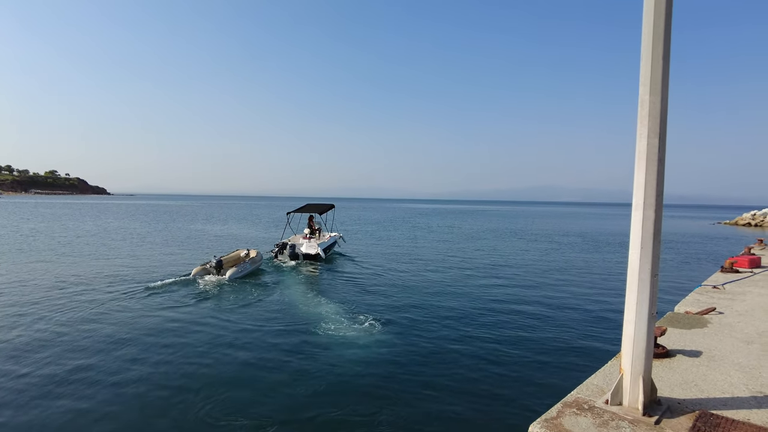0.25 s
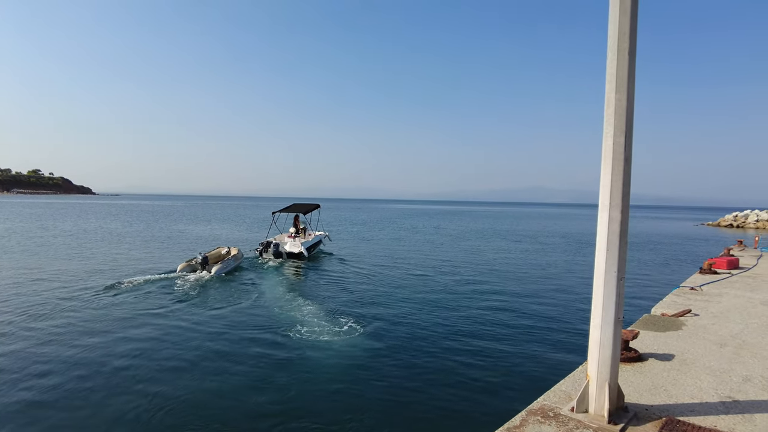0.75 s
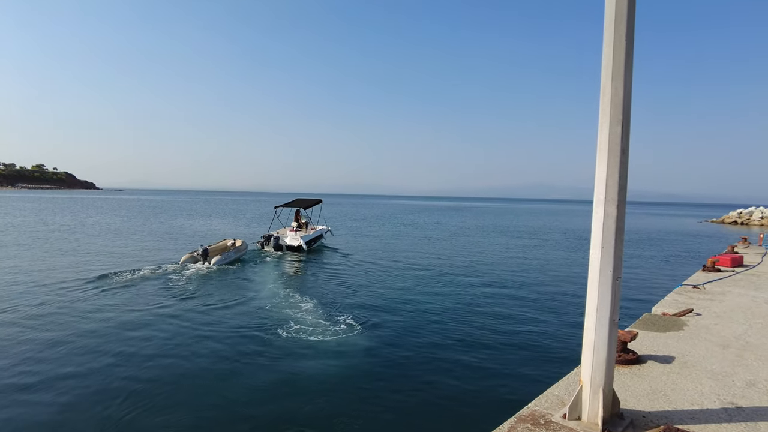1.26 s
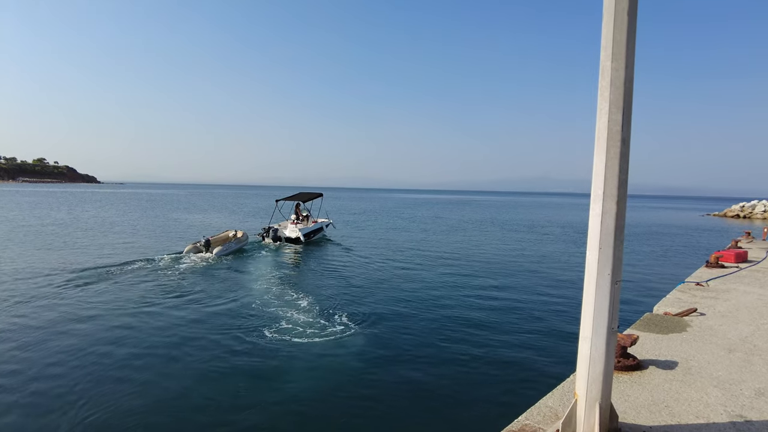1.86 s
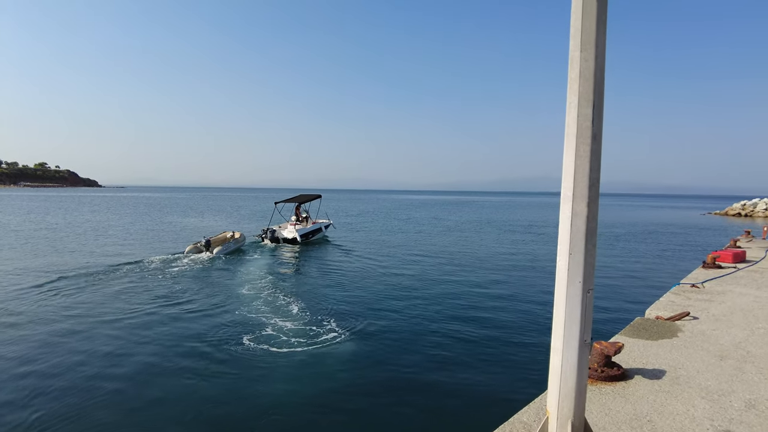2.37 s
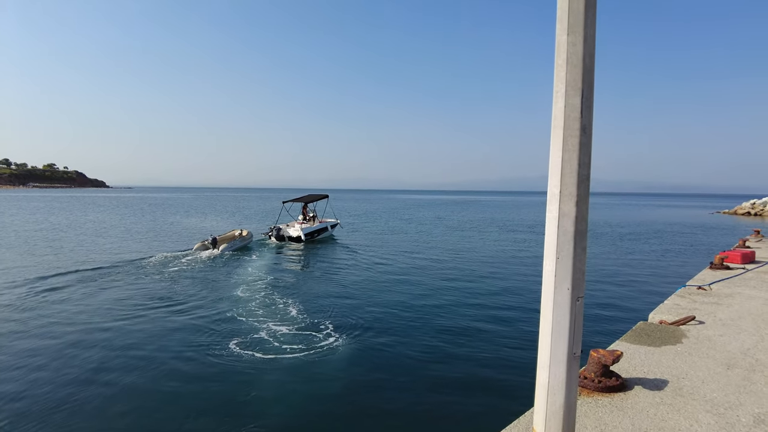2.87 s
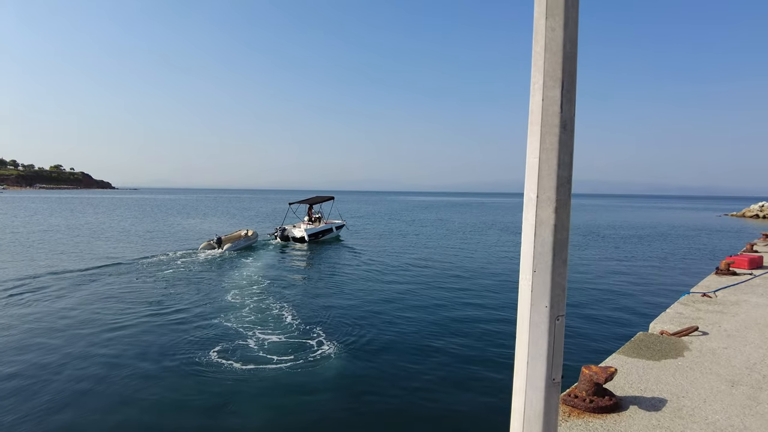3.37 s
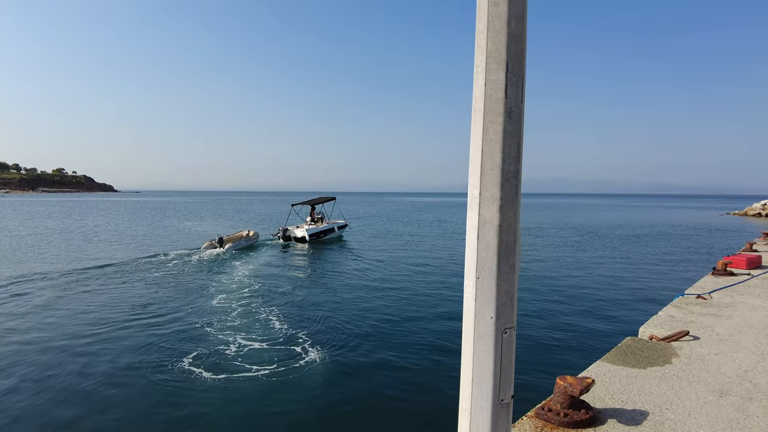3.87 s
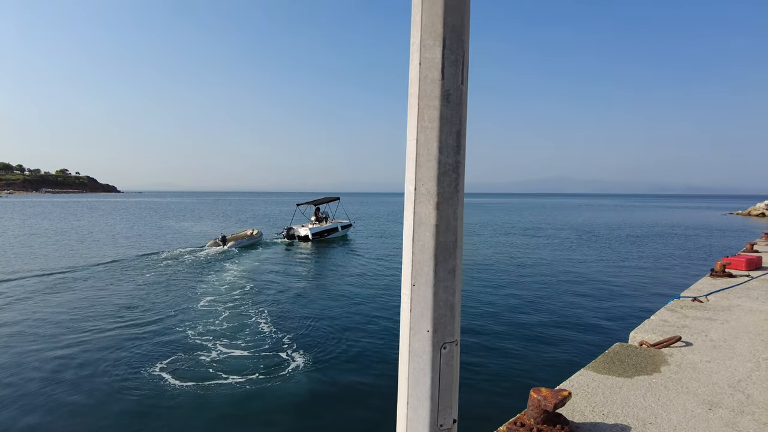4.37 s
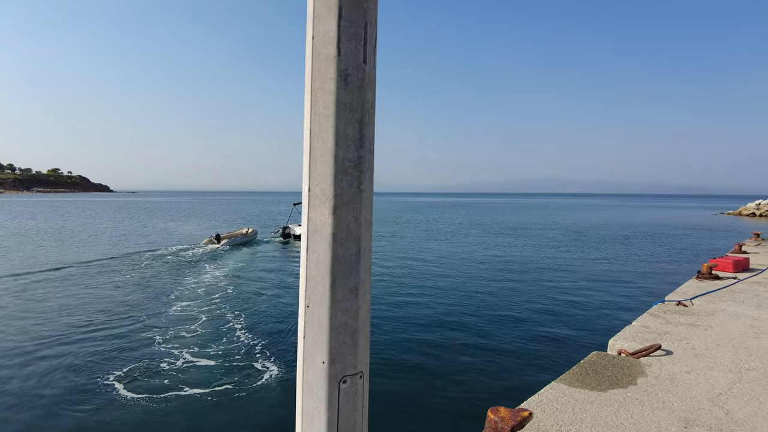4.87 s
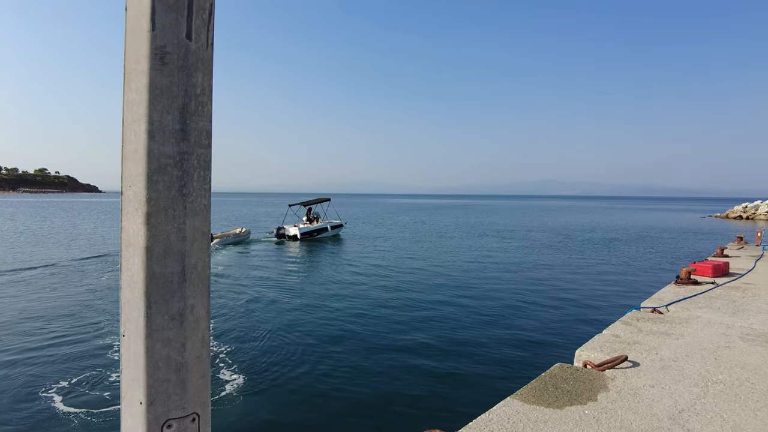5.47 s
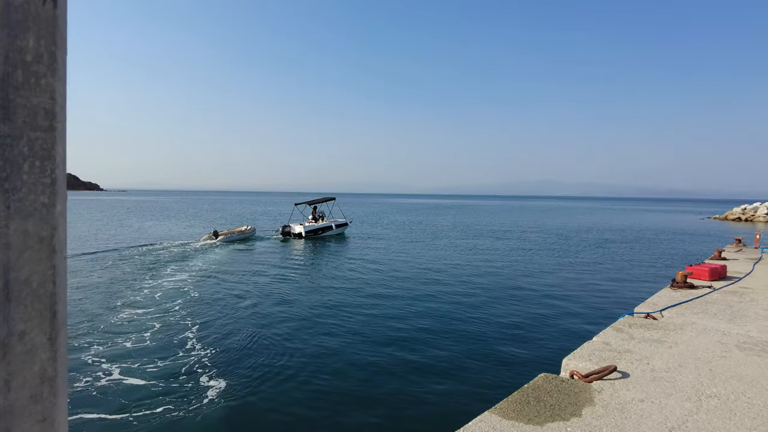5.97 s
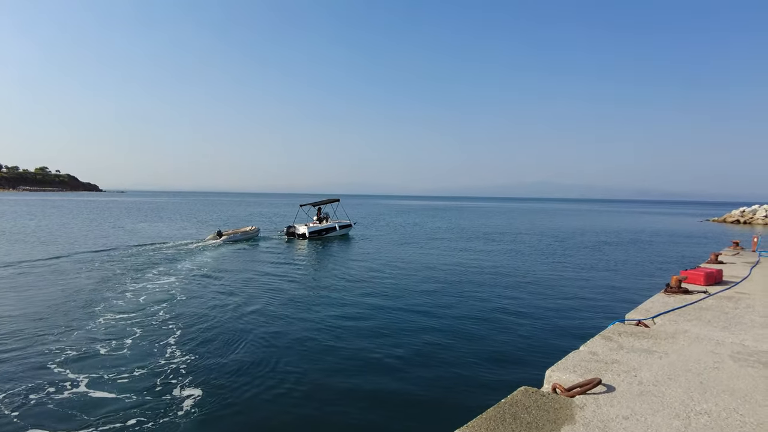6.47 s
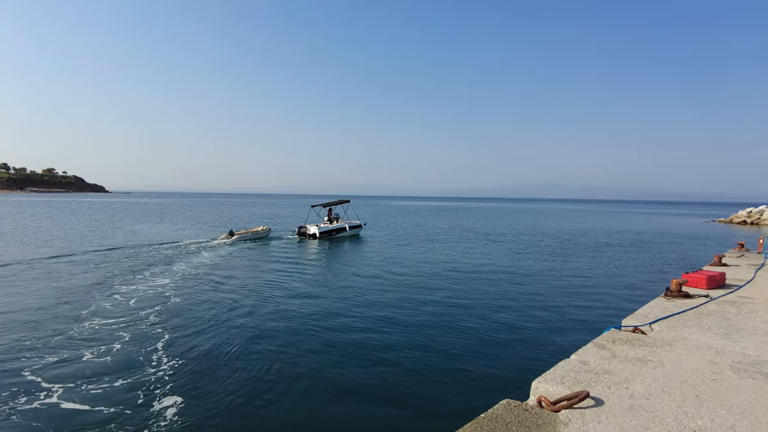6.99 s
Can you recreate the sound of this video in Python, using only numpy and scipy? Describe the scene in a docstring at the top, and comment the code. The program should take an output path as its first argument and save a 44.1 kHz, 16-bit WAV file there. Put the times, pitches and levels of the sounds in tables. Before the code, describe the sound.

From the start an outboard motor runs at some distance on open water: a low drone near 100 Hz with a weaker tone an octave below, wavering in level, plus a muffled pulsing roar and faint nasal hum. A thin whistle around 4.5 kHz is clearest at first, then comes and goes. The wake is a steady soft hiss full of tiny bubbles, thinning to about 5.3 s and partly returning. Low wind rumble fades in the first second. Plops sound at the quay wall near 0.9, 1.4, 2.0, 3.1, 3.6 and 7.0 s, with soft slaps around 0.9, 3, 5.95 and 7 s. Dry close ticks occur at 0.3, 0.6, 1.1 and 1.7 s, cluster around 3, one bright at 4, more near 6. From 4.4 to 5.6 s gusts swell with dull thuds, another at 6. The drone dips, surging briefly until the end at 7.2 s.

```python
"""A small outboard motor drones on a calm bay as its boat draws away from a stone quay.
Unsteady sines make the exhaust drone; pulsing noise makes the cowl's roar, and filtered noise the casing's hum.
A thin whistle comes and goes. Noise and rising damped sines make the hissing, bubbling wake.
Gusts are low noise with a few thuds; damped sines make plops at the wall and dry ticks close by.
All but the ticks pass a two-port microphone model that sets the stereo image."""
import sys
import numpy as np
from scipy import signal
from scipy.fft import rfft, irfft, next_fast_len
from scipy.io import wavfile
from scipy.ndimage import uniform_filter1d, map_coordinates

SR = 44100
rng = np.random.default_rng(int(sys.argv[2]) if len(sys.argv) > 2 else 0)


def persist_wave(psi):
    """Save psi, clipped to +-1, as 16-bit WAV."""
    counts = np.round(np.clip(psi, -1, 1) * 32767).astype(np.int16)
    wavfile.write(sys.argv[1], SR, np.atleast_2d(counts).T)


N = 318843  # length in samples

# Loudness of the boat's two noises: t/s, wake level/dB, cowl roar level/dB
BOAT_LEVELS = [(0.05, -52, -49), (2.24, -54.5, -51), (2.6, -54, -52.5), (3.1, -54.5, -51.5),
               (3.63, -54.5, -51), (5.05, -56, -59.5), (5.35, -58.5, -55.5), (5.66, -57.5, -58),
               (6.14, -55, -60), (6.7, -56, -53.5), (7.2, -56.5, -52.5)]
# Colour of churned water: f/Hz, relative level/dB
WATER_COLOUR = [(590, -8.5), (1000, 1.5), (1160, -2), (1350, 2), (1480, 0), (1590, 0), (1900, -5),
                (2080, -9), (3000, -9), (3860, -18), (4370, -15), (5140, -18.5), (5660, -16), (7000, -21.5),
                (9100, -34), (15400, -120)]


def amp(db):
    """Turn a level in dB into a gain."""
    return 10 ** (np.asarray(db) / 20)


def unit(x):
    """Scale x to an rms of 1."""
    return x / np.sqrt(np.mean(x ** 2) + 1e-20)


def along(points, hz):
    """Read each column after the frequency, on a log frequency axis."""
    f, *cols = np.transpose(points)
    return np.squeeze([np.interp(np.log(hz + 1), np.log(f + 1), c) for c in cols])


def curves(rows):
    """Draw each column after the time as one value per sample."""
    s, *cols = np.transpose(rows)
    return [np.interp(np.arange(N) / SR, s, c) for c in cols]


def wobble(rate):
    """Draw a smooth random curve with rate knots a second."""
    knots = rng.standard_normal(int(N * rate / SR) + 4)
    return map_coordinates(knots, [np.arange(N) * rate / SR])


def filtered(x, response):
    """Multiply the spectrum of x by a response that depends on frequency."""
    m = next_fast_len(N + SR // 2)
    return irfft(rfft(x, m) * response(np.fft.rfftfreq(m, 1 / SR)), m)[..., :N]


def rush(spectrum, patchy_db, extra=0):
    """Make two unrelated noises of one colour, with shared patches of random gain in time and pitch."""
    z = signal.stft(rng.standard_normal((2, N)) + extra, nperseg=512)[2]
    field = uniform_filter1d(rng.standard_normal(z.shape[1:]), size=6, axis=0)
    field = uniform_filter1d(field, size=10, axis=1)
    pair = signal.istft(z * amp(patchy_db * unit(field)), nperseg=512)[1][:, :N]
    return unit(filtered(pair, lambda hz: amp(along(spectrum, hz))))


def ring(hz, t60, rise, glide):
    """Make a damped sine with a peak of 1; a positive glide makes its pitch climb as it dies."""
    t = np.arange(SR // 10) / SR
    tone = np.sin(2 * np.pi * hz * t * (1 + glide * t / t60))
    wave = tone * amp(-60 * t / t60) * (1 - np.exp(-t / rise))
    return wave / np.abs(wave).max()


def exhaust(turns):
    """Exhaust drone: sines at 1 to 4 times the shaft speed, each wavering in level and phase."""
    # Second order, two firings a turn: t/s, level/dB
    motor = [(0.05, -37.5), (0.35, -31), (1.01, -38.5), (1.54, -30), (1.76, -38.5), (2.5, -37),
             (2.9, -38.5), (3.02, -44), (3.15, -38.5), (3.69, -34), (3.92, -46), (4.07, -36.5), (4.22, -38),
             (4.3, -45.5), (4.6, -49.5), (4.81, -29.5), (4.85, -46), (5.01, -35.5), (5.43, -58),
             (5.47, -48), (6.34, -53), (6.4, -64), (6.58, -39.5), (7.08, -50), (7.14, -35.5), (7.2, -47)]
    # The other orders: t/s, first level/dB, third level/dB, fourth level/dB
    side_orders = [(0, -41, -44, -62), (.5, -41, -50.5, -49.5), (.95, -41, -49, -51.5),
                   (1.5, -41, -47.5, -63), (1.9, -47.5, -60, -56), (2.5, -41.5, -50.5, -49.5),
                   (3.35, -48.5, -51.5, -53.5), (3.55, -49, -59, -54), (3.75, -47, -62, -48),
                   (4.1, -50, -52, -50.5), (4.4, -45, -47.5, -47.5), (4.65, -55, -52, -61),
                   (4.85, -55, -49, -50), (5.05, -55, -61, -65), (5.35, -36.5, -50, -49.5),
                   (5.55, -52.5, -53.5, -55.5), (6.3, -44, -57, -64), (6.7, -43.5, -56, -58),
                   (7, -48, -47, -62), (7.23, -49, -56, -65)]
    first, third, fourth = curves(side_orders)
    tone = np.zeros((2, N))
    for k, db in enumerate([first, curves(motor)[0], third, fourth], start=1):
        phase = 2 * np.pi * (k * turns + rng.random())
        phase += 0.18 * np.sqrt(k) * wobble(12) + 0.41 * wobble(3.7)
        level_db = db + 1.5 * wobble(18)
        if k == 1:
            phase += 0.3 * wobble(20)
        if k != 2:
            level_db = level_db + 1.2 * wobble(9.7)
        # an unshared part, a quarter cycle apart and slowly wobbling, sways the image
        unshared = 1.2 * wobble(1.804) * np.cos(phase)
        tone += np.sqrt(2) * amp(level_db) * [np.sin(phase), unshared]
    return tone


def cowl_roar(turns):
    """Cowl roar: noise that swells at each firing, every puff with its own strength."""
    # Colour of the roar: f/Hz, relative level/dB
    cowl_colour = [(150, -36), (240, 0), (320, -0.5), (430, -3.5), (520, -9), (680, -1.5), (850, -2),
                   (1050, -20.5), (1300, -64)]
    firing = (2 * turns).astype(int)  # which firing each sample belongs to
    strength = amp(1.5 * rng.standard_normal(firing[-1] + 1))
    size = uniform_filter1d(strength[firing], size=SR // 400)
    beat = size * (1 - 0.2 * np.cos(4 * np.pi * turns))
    roar = unit(beat * rush(cowl_colour, patchy_db=1.0))
    return amp(curves(BOAT_LEVELS)[1] + 0.53 * wobble(9)) * roar


def engine():
    """One unsteady shaft drives both the exhaust drone and the pulsing roar."""
    # Shaft speed before its random wobble: t/s, speed/(turns per s)
    shaft = [(0, 45.3), (.5, 49), (1, 47.6), (1.5, 48.3), (2.2, 50.4), (3.4, 49.8), (3.8, 51.2),
             (4.4, 48.7), (4.85, 50), (5.4, 50.3), (7.23, 48.5)]
    speed = curves(shaft)[0] * (1 + 0.0046 * wobble(6))
    turns = np.cumsum(speed) / SR
    return exhaust(turns) + cowl_roar(turns)


def casing():
    """Random knocks inside the motor keep a few narrow resonances humming."""
    # Resonances before the response is squared: f/Hz, width/Hz, level/dB
    resonances = [(428, 41, -1), (861, 35, -1), (1872, 174, 1)]
    # The hum is stronger as the stern turns this way: t/s, level/dB
    stern = [(0, -59.5), (1, -65), (3, -62.5), (4.2, -58.5), (5, -58.5), (6.2, -58.5), (6.6, -57),
             (7.23, -62)]

    def response(f):
        """Add up the resonances, then square the size of their sum."""
        modes = 0
        for c, w, db in resonances:
            modes = modes + amp(db) * 1j * f * w / (c * c - f * f + 1j * f * w) / np.sqrt(w)
        return modes * np.abs(modes)

    hum = unit(filtered(rng.standard_normal((2, N)), response))
    return amp(curves(stern)[0] + 0.67 * wobble(11.0)) * hum


def whistle():
    """A thin fuzzy band: low noise shifted up to a moving pitch, coming and going."""
    # Middle of the band: t/s, f/Hz, level/dB
    band = [(0, 4750, -66), (.6, 4720, -77), (.9, 4440, -73), (2, 4350, -80), (3.8, 4399, -98),
            (4.2, 4440, -73), (4.8, 4390, -83), (5.5, 4400, -79), (6.5, 4430, -79), (6.95, 4434, -73.5),
            (7.23, 4418, -72)]
    hz, level_db = curves(band)
    a, b = rush([(1, 0), (170, -2), (400, -20), (800, -80)], patchy_db=2)
    turn = 2 * np.pi * np.cumsum(hz) / SR
    fuzz = a * np.cos(turn) + b * np.sin(turn)
    return amp(level_db + 2.9 * wobble(17)) * fuzz * [[1], [.5]]


def bubbles(count):
    """Bubbles: short damped sines that rise in pitch, swelling together; low ones tend to be louder."""
    place, pitch, size = rng.random((count, 3)).T
    start, span = (place * N).astype(int), np.arange(SR // 40)
    hz = (450 * 9 ** pitch)[:, None]
    cycles = span / SR * hz
    wave = np.sin(2 * np.pi * cycles * (1 + 0.00785 * cycles))
    wave *= np.exp(-cycles / 6) * (1 - np.exp(-cycles / 1.2))
    wave *= np.cos(np.pi / 2 * span / len(span))  # fade to silence
    gain = amp(8.3 * size + 1.7 * wobble(16)[start])[:, None] * (1000 / hz) ** 0.29
    # add every bubble into one line at its own start
    where = (start[:, None] + span).ravel()
    line = np.bincount(where, (gain * wave).ravel(), N + len(span))[:N]
    return unit(line) * [[1], [0]]


def wake():
    """Churned water: noise strewn with pops and bubbles, over a smooth far hiss that sinks with it."""
    # Colour of the far hiss: f/Hz, relative level/dB
    air_colour = [(4000, -11), (6500, -2), (7800, 18.5), (9500, 14), (12000, 8), (16000, -13)]
    t = np.arange(N) / SR
    level_db = curves(BOAT_LEVELS)[0]
    is_pop = rng.random((2, N)) < 400 / SR  # about 400 pops a second on each side
    pops = is_pop * rng.standard_normal((2, N)) * amp(9 + 3 * wobble(12))
    foam_db = level_db + 0.33 * wobble(11) + 0.5 * wobble(25)
    foam = amp(foam_db) * rush(WATER_COLOUR, patchy_db=1.25, extra=pops)
    # the far hiss fades by 0.6 dB a second and follows the wake's level
    far_db = -75.2 - 0.6 * t + 1.2 * (level_db - level_db.mean())
    far_db += -10 * np.exp(-.5 * ((t - 4.3) / 0.24) ** 2)  # it dips briefly around 4.3 s
    air = amp(far_db + 1.9 * wobble(10)) * rush(air_colour, patchy_db=1.5)
    return foam + amp(level_db - 6.5) * bubbles(count=1400) + air


def splash():
    """Soft slaps of water: brief swells of noise with the wake's colour."""
    # Swells: middle t/s, spread t/s, level/dB
    slaps = [(2.92, 0.022, -56), (3.08, .012, -56), (5.93, 0.014, -60), (5.975, 0.016, -54),
             (6.97, 0.018, -53), (.9, .02, -55)]
    t = np.arange(N) / SR
    swell = sum(amp(db) * np.exp(-.5 * ((t - s) / spread) ** 2) for s, spread, db in slaps)
    return swell * amp(1.7 * wobble(80)) * rush(WATER_COLOUR, patchy_db=1.5)


def plops():
    """Air pockets closing against the quay wall: damped sines that rise in pitch."""
    # Plops: t/s, peak level/dB before the ports, starting f/Hz
    pockets = [(0.892, -37, 340.2), (1.445, -32, 580), (2.008, -32.5, 520.5), (3.082, -36, 790),
               (3.615, -38, 749), (6.964, -40, 342)]
    out = np.zeros((2, N + SR))
    for s, db, hz in pockets:
        out[0, round(s * SR):][:SR // 10] += amp(db) * ring(hz, t60=0.02, rise=0.00062, glide=0.16)
    return out[:, :N]


def ticks():
    """Short dry ticks near the microphone, each with its own lean, the left port always a little later."""
    # Ticks: t/s before the lag, level/dB, starting f/Hz, lean to the left/dB before scaling, crackle level/dB
    clicks = [(0.2643, -45, 3100, -2, -55), (.587, -37.5, 2860, 1, -60), (1.088, -44, 2800, -4, -59),
              (1.656, -49, 2900, 1, -66), (2.909, -39, 3205, 5, -62), (2.971, -46, 1096, 0, -62),
              (3.082, -35, 2571, -4, -62), (3.029, -45, 2200, 0, -66), (4.0412, -30.5, 7300, 5, -64),
              (5.913, -38, 1488, 0, -49), (5.977, -43, 1912, 0, -65), (6.016, -43, 2700, -2, -44.5)]
    out, t = np.zeros((2, N + SR)), np.arange(SR // 10) / SR
    grain = signal.butter(2, [900, 6000], "bandpass", fs=SR, output="sos")
    for s, db, hz, pan_db, crackle_db in clicks:
        grit = signal.sosfilt(grain, rng.standard_normal((2, len(t)))) * (1 - np.exp(-t / 0.00034))
        # a tick and a lower, softer knock, each dying by 60 dB in 14 cycles
        knock = 0
        for f, d in [(hz, 0), (0.69 * hz, -10.5)]:
            knock = knock + amp(d) * ring(f, t60=14 / f, rise=0.000099, glide=0.022)
        crackle = amp(crackle_db - 60 * t / 0.07) * grit  # dies by 60 dB in 0.07 s
        sound = amp(db) * knock + crackle
        # left, then right: share of the lean, lag in seconds
        for port, (share, lag_s) in enumerate([(.5, 0.00055), (-0.68, 0.00004)]):
            out[port, round((s + lag_s) * SR):][:len(t)] += amp(share * pan_db) * sound[port]
    return out[:, :N]


def wind():
    """Gusts: noise rumbling in lumps, a few single buffets, and a flutter that reaches a little higher."""
    # Strength of the gusts: t/s, deep level/dB, flutter level/dB
    gusts = [(0, -39, -43), (.55, -47, -44.5), (1.66, -50.5, -42), (2.1, -53, -46), (2.7, -48, -47),
             (3, -49, -44.5), (3.42, -41, -44.5), (3.82, -38.5, -43), (4.33, -43.5, -43.5),
             (4.45, -29.5, -44.5), (4.65, -37.5, -43.5), (4.78, -37, -42), (4.92, -32, -43),
             (5.06, -28.5, -43), (5.2, -38, -44), (5.35, -38.5, -47.5), (5.5, -33.5, -45.5),
             (5.6, -36.5, -47.5), (6.07, -37, -41), (6.2, -39, -41.5), (7.23, -46, -46.5)]
    # Colours of the rumble and of the flutter: f/Hz, relative level/dB
    deep_colour = [(3, -19), (14, -1.5), (28, 4), (42, 0), (65, -3.5), (90, -3.5), (150, -97)]
    flutter_colour = [(40, -40), (60, 4.5), (85, 8), (125, 7), (170, 3), (250, -4.5), (340, -13.5),
                      (450, -39.5)]
    # Single buffets: t/s, peak level/dB before the ports, f/Hz
    thumps = [(4.814, -21, 44.5), (5.136, -21.5, 32.1), (5.262, -30, 39.63), (5.479, -22, 33.8),
              (6.021, -24.5, 39)]
    deep_db, flutter_db = curves(gusts)
    deep = amp(deep_db + 1.74 * wobble(12.0)) * rush(deep_colour, patchy_db=1.35)
    buffets = np.zeros(N + SR)
    for s, db, hz in thumps:
        buffets[round(s * SR):][:SR // 10] += amp(db) * ring(hz, t60=0.077, rise=0.0013, glide=0)
    flutter = amp(flutter_db + 0.8 * wobble(15)) * rush(flutter_colour, patchy_db=1.67)
    return deep + buffets[:N] * [[1], [0]] + flutter


def ports(pair):
    """A shared and an unshared part reach each port, with a lead and balance that depend on pitch."""
    # The two ports: f/Hz, likeness from 0 to 1, lead of the left/radians, left over right/dB
    port_table = [(30, .995, 0, 0), (100, .976, .05, 0), (260, .88, .1, .4), (430, .74, .35, .6),
                  (530, .45, .8, 1), (690, .72, 1.9, 1.2), (1000, .63, 1.8, 1), (1200, .6, .9, .8),
                  (1400, .9, .45, .8), (2000, .86, .45, .7), (2600, .7, .7, .8), (3500, .32, .75, 1.5),
                  (6000, .27, .8, 1.5), (12000, .05, 1, .7)]

    def response(hz):
        """Give each port's gain for the shared part, then for the unshared one."""
        alike, lead, tilt_db = along(port_table, hz)
        turn = np.arccos(np.clip(alike, 0, 1)) / 2
        half = np.exp(.5j * lead) * amp(tilt_db / 2)  # each port takes half the difference
        left = [np.cos(turn) * half, np.sin(turn) * half]
        right = [np.cos(turn) / half, -np.sin(turn) / half]
        return np.array([left, right])

    return filtered(pair[None], response).sum(axis=1)


def scene():
    """Everything but the ticks passes the ports; the ticks arrive directly."""
    boat = engine() + casing() + whistle() + wake()
    return ports(boat + splash() + plops() + wind()) + ticks()


def record(dry):
    """Keep nothing at or above the band limit of 15720 Hz."""
    return filtered(dry, lambda hz: hz < 15720)


dry = scene()
out = record(dry)
persist_wave(out)
```